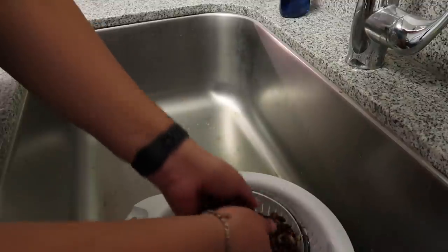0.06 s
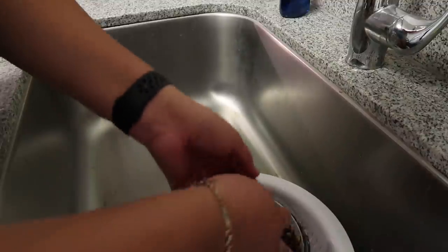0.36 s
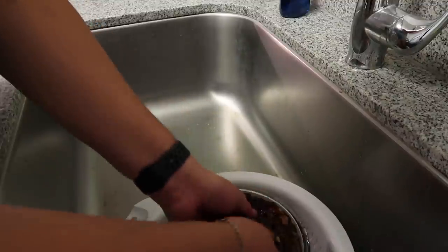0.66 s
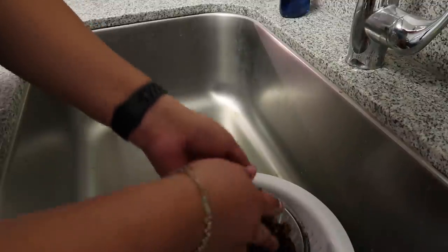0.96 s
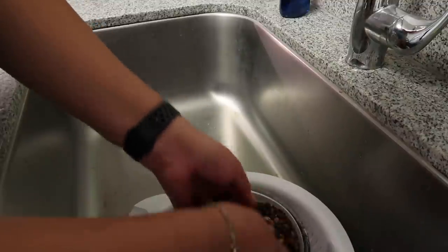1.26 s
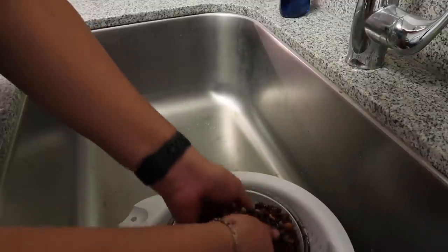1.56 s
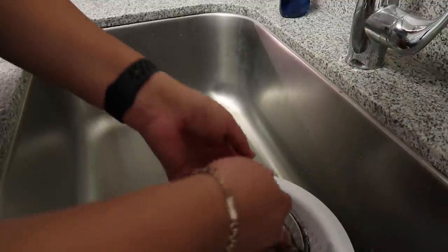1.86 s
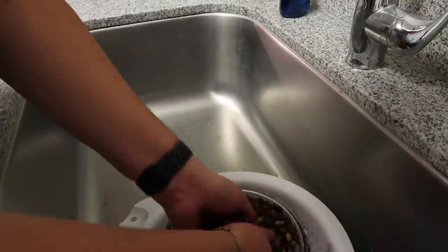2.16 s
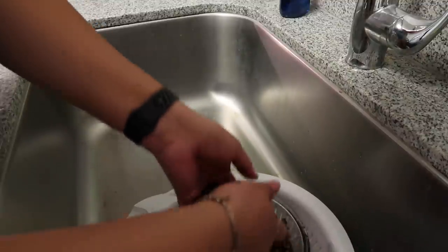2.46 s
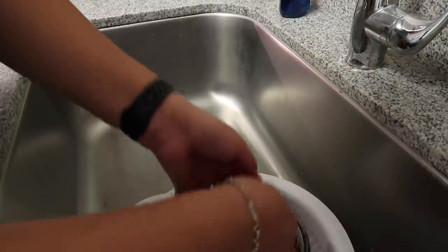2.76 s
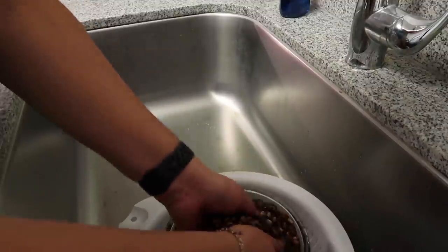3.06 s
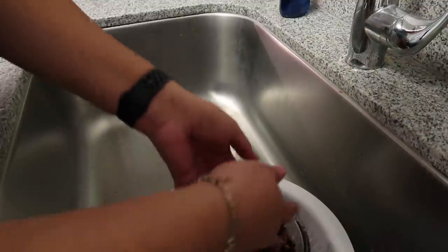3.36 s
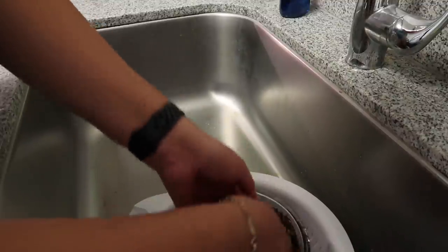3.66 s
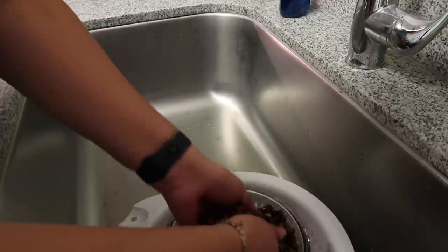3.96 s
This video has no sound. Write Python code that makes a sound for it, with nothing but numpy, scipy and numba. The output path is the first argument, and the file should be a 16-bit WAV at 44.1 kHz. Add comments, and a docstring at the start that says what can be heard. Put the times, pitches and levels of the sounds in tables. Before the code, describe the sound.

Small nuts rattle in a mesh strainer, swirled by hand in five strokes.

```python
"""Small nuts rattle in a mesh strainer, swirled by two hands in five strokes; the strainer sits in a
plastic bowl in a steel sink. Each stroke drags the nuts over the mesh with a falling rasp, tosses them
in a bright clatter and gathers them again while stray nuts tick down. The rattle is a random train of
impacts, filtered by the hollow under the hands, and it excites the modes of strainer and bowl.
The wobbling bowl rings with short low tones, and a low hum, swelling at times, fills the quiet kitchen."""
import sys
import numpy as np
from scipy import signal
from scipy.fft import rfft, irfft
from scipy.io import wavfile
from scipy.ndimage import uniform_filter1d
from numba import njit

SR = 44100
rng = np.random.default_rng(int(sys.argv[2]) if len(sys.argv) > 2 else 0)


def dump(signal):
    """Clip the signal to [-1, 1] and save it as 16-bit WAV at the path in sys.argv[1]."""
    limited = np.clip(np.atleast_2d(signal).T, -1, 1)
    pcm = np.round(limited * 32767).astype(np.int16)
    wavfile.write(sys.argv[1], SR, pcm)


N = 176400
TIME = np.arange(N) / SR

# Stereo width of the rattle. Each row: frequency in Hz, side level minus mid level in dB.
RATTLE_WIDTH = [(400, 2), (700, -24), (1280, -26.5), (2370, -18), (4380, -4.5), (6300, -3), (8080, 2.2),
                (10500, 4), (13000, 11.5)]


def amp(db):
    """Amplitude ratio of a level in decibels."""
    return 10 ** (np.asarray(db) / 20)


def unit(x):
    """Normalisation of each channel to an rms of 1."""
    return x / np.sqrt(np.mean(x ** 2, axis=-1, keepdims=True) + 1e-20)


def at_hz(points, hz):
    """Interpolation of a spectrum on a logarithmic frequency axis."""
    frequencies, levels = np.transpose(points)
    return np.interp(np.log(np.maximum(hz, 1)), np.log(frequencies), levels)


def widen(x, side_db):
    """Stereo width: the side of a mid-side pair is scaled against its mid."""
    return np.array([x[0], amp(side_db) * x[1]])


def left_right(x):
    """Sum and difference turn mid and side into left and right."""
    return np.array([x[0] + x[1], x[0] - x[1]])


def band(x, low_hz, high_hz):
    """Butterworth band-pass filter."""
    sos = signal.butter(2, [low_hz, min(high_hz, SR / 2 - 1000)], "band", fs=SR, output="sos")
    return signal.sosfilt(sos, x + 1e-18)


def resonance(x, hz, width_hz):
    """A damped resonator with unity gain at its peak."""
    radius = np.exp(-np.pi * width_hz / SR)
    feedback = [1, -2 * radius * np.cos(2 * np.pi * hz / SR), radius ** 2]
    return signal.lfilter(np.array([1, 0, -1]) * (1 - radius ** 2) / 2, feedback, x + 1e-18)


def mode(x, hz, t60):
    """A normal mode: its bandwidth is inversely proportional to its decay time."""
    return resonance(x, hz, np.log(1000) / (np.pi * t60))


def dying_noise(t60):
    """Exponentially decaying noise, mid and side each with unit energy."""
    t = TIME[:SR // 2]
    noise = rng.standard_normal((2, len(t))) * np.exp(-np.log(1000) * t / t60)
    return unit(noise) / np.sqrt(len(t))


def swell(peak_s, half_s):
    """A Gaussian envelope whose half-length is its standard deviation."""
    return np.exp(-.5 * ((TIME - peak_s) / half_s) ** 2)


def tone_burst(peak_s, hz, db, half_s, wander_hz):
    """Random frequency modulation of a tone that swells and fades."""
    wander = unit(uniform_filter1d(rng.standard_normal(N), int(SR / wander_hz) + 1))
    phase = 2 * np.pi * np.cumsum(hz + wander_hz * wander) / SR
    return amp(db) * np.sqrt(2) * swell(peak_s, half_s) * np.sin(phase)


def contacts(per_s, spread_db=2):
    """A Poisson train of uneven impulses whose mean power is independent of their rate."""
    sizes = amp(spread_db * np.minimum(rng.exponential(1, N), 4))
    return (rng.random(N) < per_s / SR) * sizes / np.sqrt(per_s)


def background():
    """Broadband noise makes the kitchen's rumble, narrowband noise its wavering hum."""
    # Spectrum of the rumble. Each row: frequency in Hz, relative spectral density in dB.
    spectrum = [(15, 4.5), (27, -3.5), (42, -16), (62, -3.5), (85, -0.5), (130, -2), (200, -11), (300, -21),
                (550, -16.5), (800, -24), (2000, -15), (6000, -26), (15000, -75)]
    hz = np.arange(N // 2 + 1) * SR / N
    rumble = unit(irfft(rfft(rng.standard_normal((2, N))) * amp(at_hz(spectrum, hz)), N))
    hum = unit(resonance(rng.standard_normal((2, N + SR)), hz=112, width_hz=25)[:, SR:])
    return widen(amp(-39.5) * rumble + amp(-46.5) * hum, side_db=-36)


def impact_db(hz, rasp_db, clatter_db, rasp_top_hz=2800, clatter_from_hz=9500):
    """Spectral envelope of the impacts: the low bands follow the rasp, the high ones the clatter."""
    # Spectrum of the nut contacts. Each row: frequency in Hz, relative third-octave level in dB.
    spectrum = [(450, -20), (620, -21), (800, -25), (1000, -22.5), (1270, -22), (1650, -14), (2200, -11),
                (3200, -7.5), (4200, -5.5), (5500, -7.5), (7000, -7.5), (9000, -13.5), (11500, -12),
                (14000, -28)]
    bright = np.clip(np.log(hz / rasp_top_hz) / np.log(clatter_from_hz / rasp_top_hz), 0, 1)
    return at_hz(spectrum, hz) + (1 - bright) * rasp_db + bright * clatter_db


def drag_db(hz, contrast_db=4, width_oct=0.21, fall_s=0.14, fade_s=0.075):
    """A moving spectral peak: the rasp of each drag starts high and sinks as the heap builds up."""
    # Drags over the mesh. Each row: start and end in seconds, first and target peak frequency in Hz.
    drags = [(0.073, 0.334, 2600, 1670), (0.847, 1.06, 3020, 1390), (1.62, 1.91, 3000, 1400),
             (2.377, 2.65, 2930, 1340), (3.21, 3.45, 2160, 1210)]
    gain_db = np.zeros(N)
    for start, end, from_hz, to_hz in drags:
        held = np.clip(np.minimum(TIME - start, end - TIME) / fade_s + 1, 0, 1)
        centre_hz = to_hz + (from_hz - to_hz) * np.exp(-np.maximum(TIME - start, 0) / fall_s)
        peak = np.exp(-.5 * (np.log2(hz / centre_hz) / width_oct) ** 2)
        gain_db += held * contrast_db * (peak - .5) * (hz < 2 * from_hz)
    return gain_db


def nuts(rasp_db, clatter_db, per_s=2400, colour_db=2, skitter_db=-4.5, skitter_t60=0.057):
    """Shot noise: nuts strike the mesh and each other, more often with more effort."""
    clicks = contacts(per_s * amp(.8 * (rasp_db - rasp_db.mean())))
    decay = np.exp(-2 * np.log(1000) / (skitter_t60 * SR))
    out = np.zeros((2, N))
    for hz in 400 * 2 ** (np.arange(16) / 3):  # third-octave bands
        # Each contact has its own colour and direction, and scatters briefly in heap and sink.
        hits = clicks * amp(colour_db * np.clip(rng.standard_normal(N), -2, 2))
        skitter = amp(skitter_db) * np.sqrt(signal.lfilter([1 - decay], [1, -decay], hits ** 2 + 1e-18))
        drive = hits * rng.choice([-1, 1], (2, N)) + skitter * rng.standard_normal((2, N))
        grains = unit(band(drive, hz / 2 ** (1 / 6), hz * 2 ** (1 / 6)))
        level_db = impact_db(hz, rasp_db, clatter_db) + drag_db(hz)
        out += widen(grains * amp(level_db), at_hz(RATTLE_WIDTH, hz))
    return out


def shell_pings(rasp_db, clatter_db, count=40, low_hz=1801, high_hz=11040, gain_db=-5):
    """Free vibration: hard shells ring briefly when struck, each at its own natural frequency."""
    clicks = contacts(per_s=370) * rng.choice([-1, 1], (2, N))
    struck_shell = rng.integers(0, count, N)
    out = np.zeros((2, N))
    for shell, hz in enumerate(np.geomspace(low_hz, high_hz, count)):
        rings = unit(mode(clicks * (struck_shell == shell), hz, t60=0.074))
        out += widen(rings * amp(impact_db(hz, rasp_db, clatter_db)), at_hz(RATTLE_WIDTH, hz))
    third_octaves_per_shell = 3 * np.log2(high_hz / low_hz) / count
    return out * amp(gain_db) * np.sqrt(third_octaves_per_shell)


@njit
def moving_highpass(x, step, damping):
    """A two-pole state-variable high-pass filter with a moving resonance."""
    out, low, mid = np.zeros(len(x)), 0.0, 0.0
    for i in range(len(x)):
        low += step[i] * mid
        out[i] = x[i] - low - damping * mid
        mid += step[i] * out[i]
    return out


def hollow(x, q=3.4, skirt_ratio=0.76):
    """Cavity resonance: the hollow between hands and heap rings and passes little below its pitch."""
    # The hollow is small and high as a stroke starts, deep at the toss.
    # Each row: time in seconds, resonance in Hz.
    tuning = [(0, 1030), (.07, 1320), (.2, 1060), (.38, 840), (.52, 800), (.65, 1230), (.78, 1250),
              (.86, 1320), (.95, 990), (1.08, 880), (1.16, 1050), (1.33, 910), (1.47, 1050), (1.61, 1460),
              (1.7, 1080), (1.8, 1015), (1.97, 800), (2.15, 1010), (2.3, 1110), (2.38, 1440), (2.47, 1040),
              (2.65, 864), (2.88, 880), (3.02, 1070), (3.19, 1300), (3.26, 980), (3.34, 960), (3.5, 926),
              (3.7, 780), (3.85, 910)]
    step = 2 * np.sin(np.pi * np.interp(TIME, *np.transpose(tuning)) / SR)
    ringing = [moving_highpass(channel, step, 1 / q) for channel in x]
    return np.array([moving_highpass(channel, step * skirt_ratio, 1.0) for channel in ringing])


def rim(rattle):
    """Forced vibration: the contacts drive the modes of bowl and strainer."""
    # Modes of bowl and strainer. Each row: frequency in Hz, gain in dB, 60 dB decay time in seconds.
    modes = [(766.5, 2, 0.1), (991, 5.5, 0.17), (986, -16, 0.22), (1162, -1.5, 0.073), (1298, 8.5, 0.32),
             (1640, 7, 0.12), (1740, -5.5, 0.03), (2165, 4.5, 0.18), (2307, -2, 0.02), (2870, -27, 0.1),
             (2980, -6, 0.06)]
    return sum(amp(db) * mode(rattle, hz, t60) for hz, db, t60 in modes)


def kitchen(x, tail_db=-18.5):
    """Reverberation: the room's diffuse reflections add a short faint tail."""
    return x + amp(tail_db) * signal.fftconvolve(x, dying_noise(t60=0.43), axes=1)[:, :N]


def bowl_thuds(rasp_db, knocking_db=-27):
    """Impact excitation: the moving heap knocks the bowl's low modes, hardest when it lands."""
    # Modes of bowl and sink. Each row: frequency in Hz, relative level in dB, 60 dB decay in seconds.
    modes = [(155, -2, .22), (194.4, -2, 0.033), (219.2, -3.5, 0.27), (312.5, -1, 0.11), (349, -6.5, 0.064),
             (384, -12, 0.16)]
    # Landings of the heap. Each row: peak time in seconds, level in dB, half-length in seconds.
    landings = [(0.156, -36.5, 0.031), (0.406, -34, 0.062), (1.066, -43, 0.027), (1.177, -44.5, 0.063),
                (1.955, -38, 0.049), (2.666, -41.5, .04), (2.823, -47, 0.18), (3.47, -35, 0.049),
                (3.595, -41, 0.054), (3.787, -41, 0.034)]
    knocks = np.array([contacts(per_s=500) for _ in range(2)])
    ringing = sum(amp(db) * unit(mode(knocks, hz, t60)) for hz, db, t60 in modes)
    body = unit(band(ringing, low_hz=128, high_hz=426))
    knocking_power = amp(rasp_db + knocking_db) ** 2
    landing_power = sum((amp(db) * swell(peak_s, half_s)) ** 2 for peak_s, db, half_s in landings)
    return widen(body * np.sqrt(knocking_power + landing_power), side_db=-15.5)


def stray_nuts(gain_db=-11):
    """Impact transients: single nuts land, each with a short bright crack."""
    # Falling nuts. Each row: start in seconds, relative level of the attack in dB.
    ticks = [(0.1905, -14.5), (0.5374, -29), (0.9504, -20), (1.0276, -23), (1.255, -29), (1.3064, -25),
             (1.4147, -22), (2.0534, -42), (2.1201, -19), (2.1404, -16.5), (2.376, -29), (2.4872, -18.5),
             (2.894, -21.5), (3.2837, -19), (3.638, -18), (3.693, -21), (3.7715, -25)]
    out = np.zeros((2, N + SR))
    for start, db in ticks:
        crack = band(dying_noise(t60=0.063), low_hz=2380, high_hz=10200)
        attack_rms = crack[0, :SR // 500].std()  # first 2 ms
        i = int(start * SR)
        out[:, i:i + crack.shape[1]] += amp(db + gain_db) * crack / attack_rms
    return widen(out[:, :N], side_db=-8.5)


def mesh_catches():
    """Stick-slip friction: a nut catches on the mesh and chirps for a few milliseconds."""
    # Chirps. Each row: peak time in seconds, frequency in Hz, relative level in dB.
    chirps = [(0.333, 1650, -18.5), (.918, 2380, -20), (.95, 1030, -26.5), (1.035, 1780, -22),
              (3.231, 1220, -23.5), (3.264, 1020, -27.5), (3.331, 940, -28), (3.401, 1140, -22),
              (3.438, 1020, -23), (3.468, 2070, -18), (3.503, 1700, -21)]
    return sum(tone_burst(peak_s, hz, db, half_s=0.0044, wander_hz=90) for peak_s, hz, db in chirps)


def low_swells():
    """Short low tone bursts: the hum swells near 112 Hz and the wobbling bowl rings near 155 Hz."""
    # Low tones. Each row: peak time in seconds, frequency in Hz, level in dB, half-length in seconds.
    tones = [(0.449, 158, -32, 0.024), (0.698, 115, -39.5, 0.019), (0.866, 80, -48, 0.028),
             (0.967, 108, -39.5, .03), (1.214, 155, -41.5, 0.051), (1.285, 105, -41.5, 0.074),
             (1.484, 156, -47, .04), (2.01, 154, -36, 0.064), (2.224, 145, -44.5, 0.15),
             (2.292, 122, -36, 0.043), (2.902, 112, -37.5, 0.042), (3.41, 112, -40, 0.063),
             (3.71, 116, -39.5, 0.036)]
    return sum(tone_burst(peak_s, hz, db, half_s, wander_hz=8.92) for peak_s, hz, db, half_s in tones)


def scene():
    """Superposition: the rattle sits a little to the right and the low sounds are centred."""
    # Effort of the five strokes. Each row: time in seconds, relative rasp and clatter levels in dB.
    strokes = [(0.0, -37.5, -47), (0.049, -35, -48), (0.105, -24.5, -32), (0.152, -25, -27),
               (0.223, -20.5, -29.5), (0.303, -24, -27), (0.351, -17.5, -20), (0.392, -19, -21),
               (0.481, -34, -36.5), (0.527, -34, -43), (0.542, -31, -35.7), (0.565, -35, -43),
               (0.647, -26, -33.0), (0.677, -24.5, -36), (0.717, -34, -47), (0.79, -35, -56),
               (0.847, -28.5, -40), (0.88, -27.3, -34.0), (0.92, -22, -34), (0.966, -24, -38),
               (1.038, -22.5, -25.5), (1.078, -23.5, -25), (1.099, -23.5, -24.5), (1.124, -16, -18.5),
               (1.157, -16.5, -19), (1.195, -26.5, -29), (1.238, -33.5, -37), (1.253, -28.5, -28.5),
               (1.293, -37, -45), (1.317, -35, -27), (1.339, -33.4, -35.5), (1.445, -28, -29.5),
               (1.461, -28.5, -41), (1.501, -35.5, -45), (1.556, -41.5, -62), (1.59, -40.5, -53),
               (1.622, -26, -37), (1.79, -19.5, -28), (1.862, -22.5, -26), (1.901, -16, -20.5),
               (1.986, -26, -25.5), (2.035, -34, -41), (2.059, -31, -27.5), (2.098, -33, -37),
               (2.194, -21, -33), (2.33, -41.5, -55), (2.389, -23, -31.5), (2.466, -22, -35),
               (2.562, -20.5, -31), (2.61, -19.5, -24), (2.673, -18.0, -18.5), (2.778, -31.5, -30),
               (2.81, -34.4, -52), (2.889, -33, -37.4), (2.952, -32, -42.5), (3.031, -27, -42),
               (3.136, -39, -51), (3.193, -28.5, -39.5), (3.272, -21.5, -36), (3.344, -22.5, -31),
               (3.425, -16.5, -22.5), (3.446, -21, -23.5), (3.462, -14, -19), (3.519, -18.5, -22),
               (3.64, -33, -30.5), (3.662, -28.5, -35), (3.68, -34.5, -37), (3.706, -27.5, -42),
               (3.728, -30.5, -40.7), (3.841, -24, -36.5), (3.969, -37, -59), (3.999, -41, -47.3)]
    # Fingers dig into the heap with a sudden crunch. Each row: start in seconds, extra rasp in dB.
    digs = [(0.833, 2), (1.606, 2), (2.374, 3.5), (3.697, 3.5), (3.769, 2)]
    dig_decay_s, rattle_db, left_db, right_db = .018, -3, -2.17, -1.73
    times, *levels = np.transpose(strokes)
    rasp_db, clatter_db = [np.interp(TIME, times, level) for level in levels]
    for start, db in digs:
        rasp_db += db * (TIME >= start) * np.exp(-np.abs(TIME - start) / dig_decay_s)
    impacts = nuts(rasp_db, clatter_db) + shell_pings(rasp_db, clatter_db)
    rattle = hollow(impacts) * amp(rattle_db) + stray_nuts()
    strainer = left_right(kitchen(rattle + rim(rattle))) + mesh_catches()
    lows = left_right(bowl_thuds(rasp_db) + background()) + low_swells()
    return strainer * amp([[left_db], [right_db]]) + lows


def record(dry, stop_hz=15300):
    """Band limiting: a steep low-pass filter removes the highest treble."""
    return signal.sosfilt(signal.cheby2(12, 70, stop_hz, fs=SR, output="sos"), dry)


dry = scene()
out = record(dry)
dump(out)
```